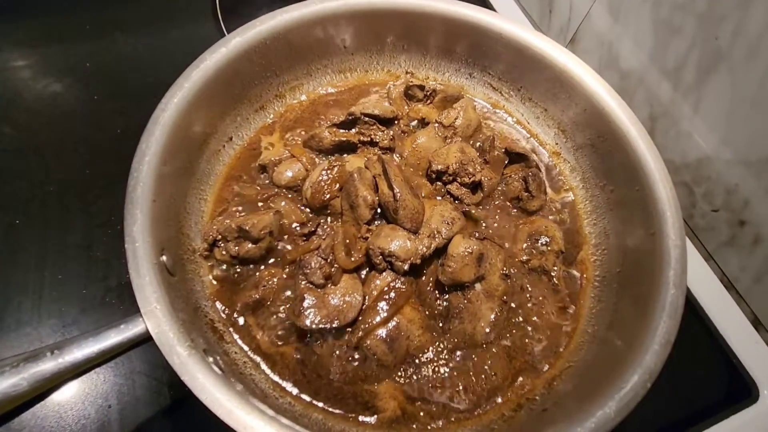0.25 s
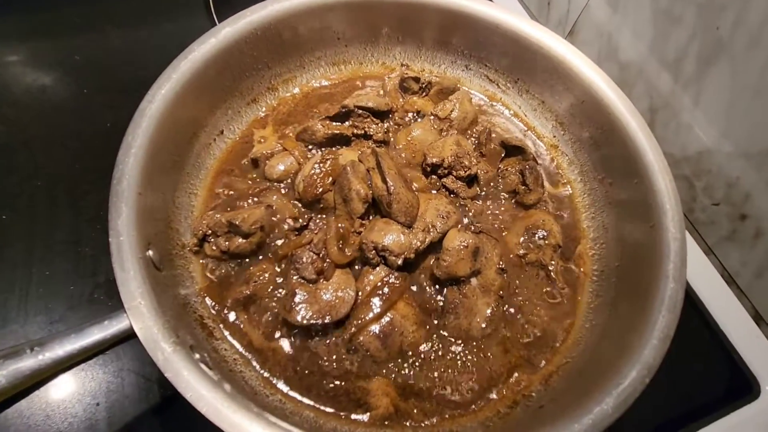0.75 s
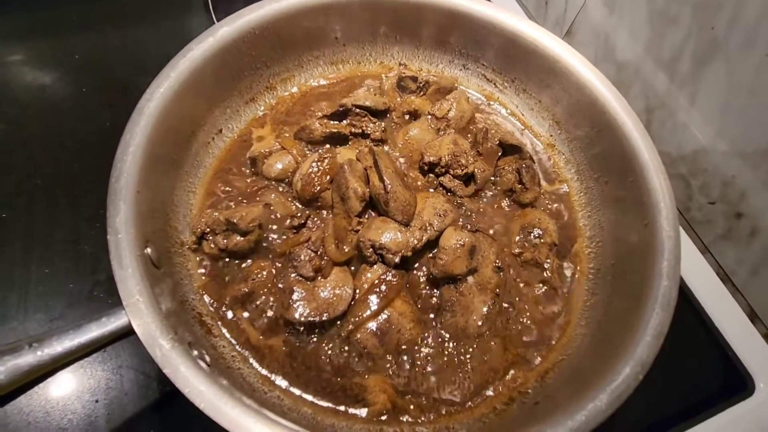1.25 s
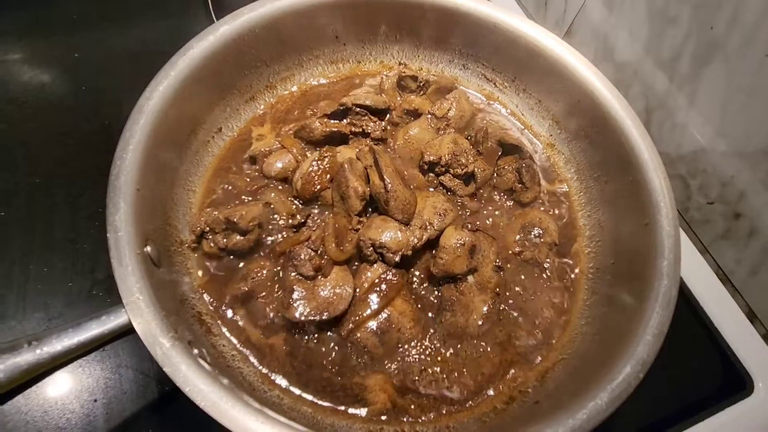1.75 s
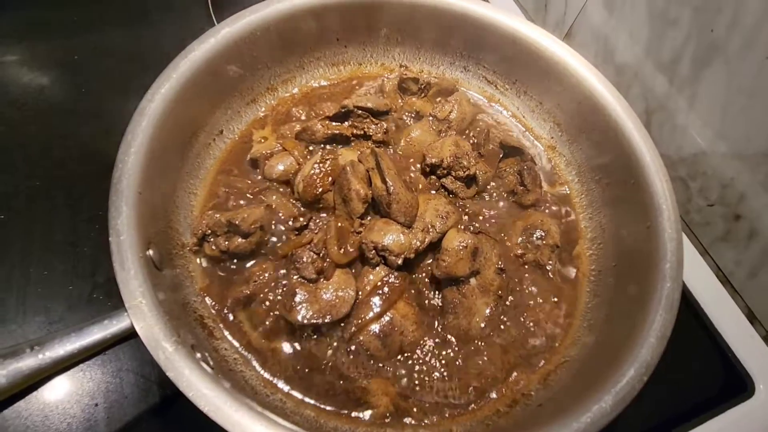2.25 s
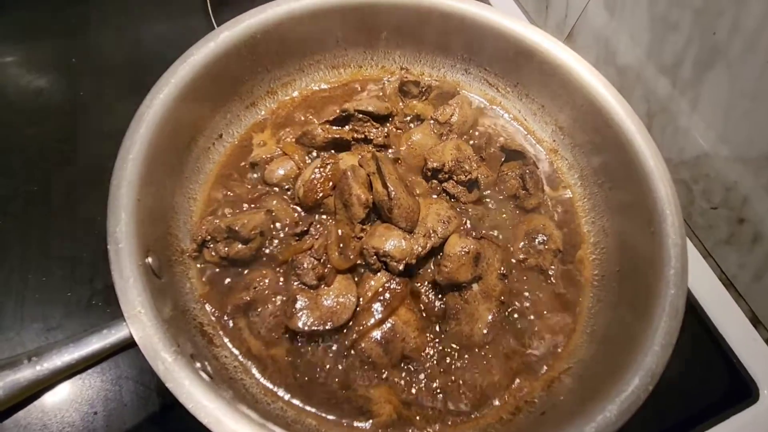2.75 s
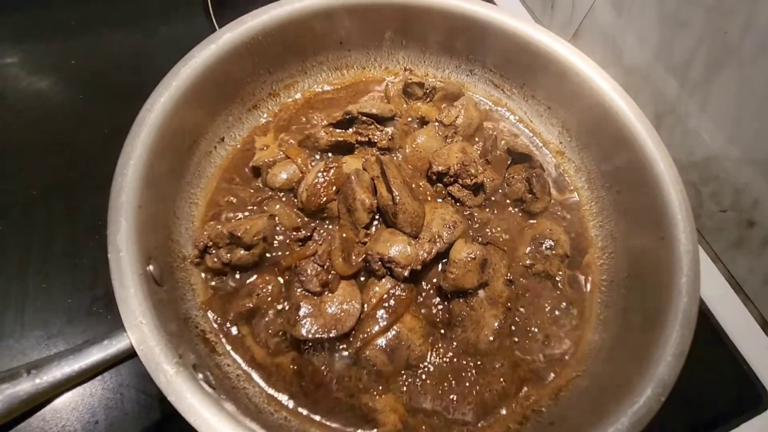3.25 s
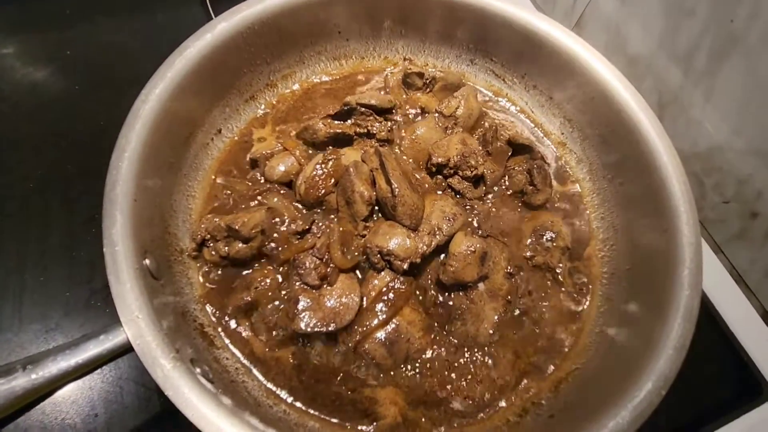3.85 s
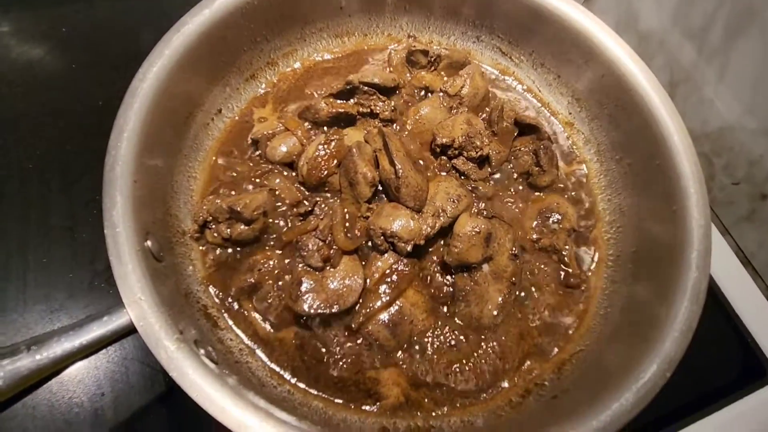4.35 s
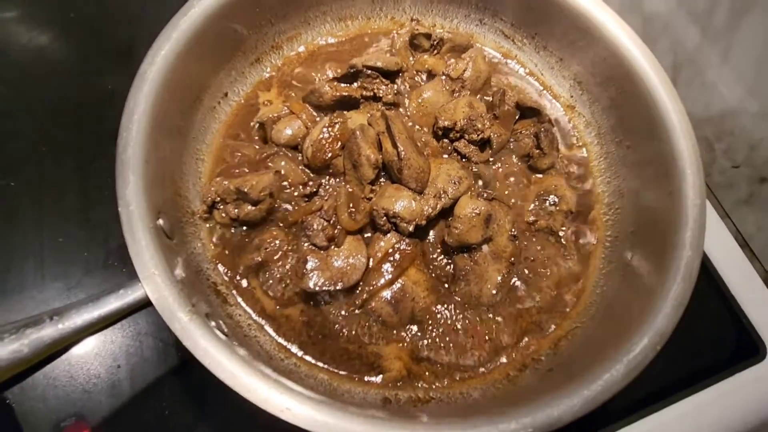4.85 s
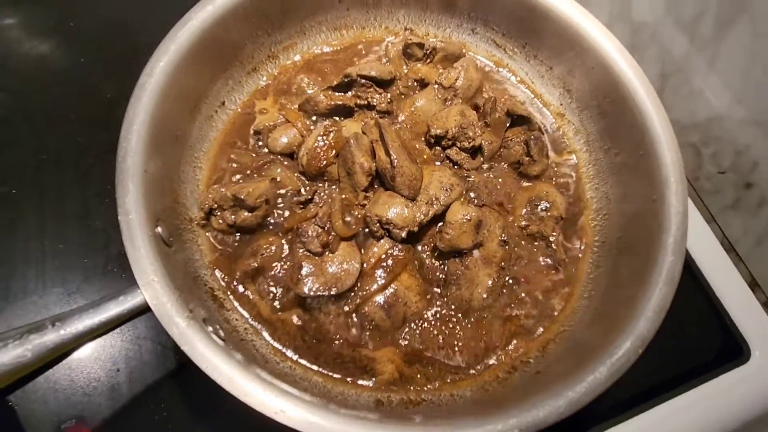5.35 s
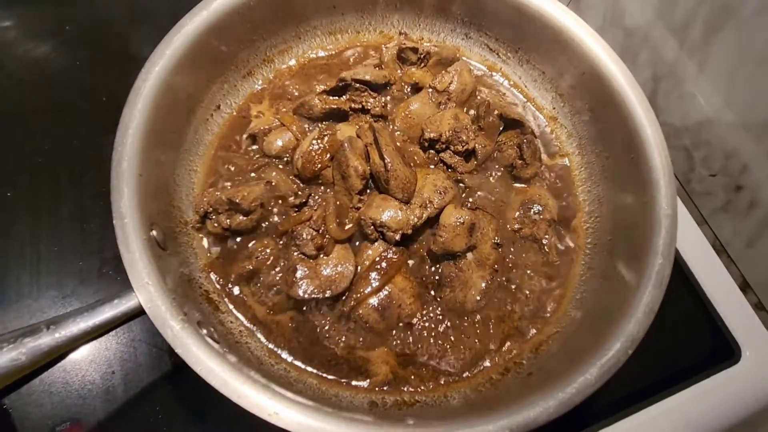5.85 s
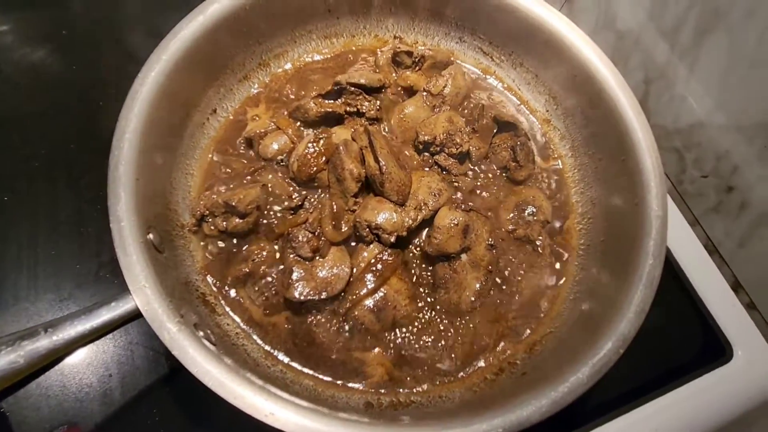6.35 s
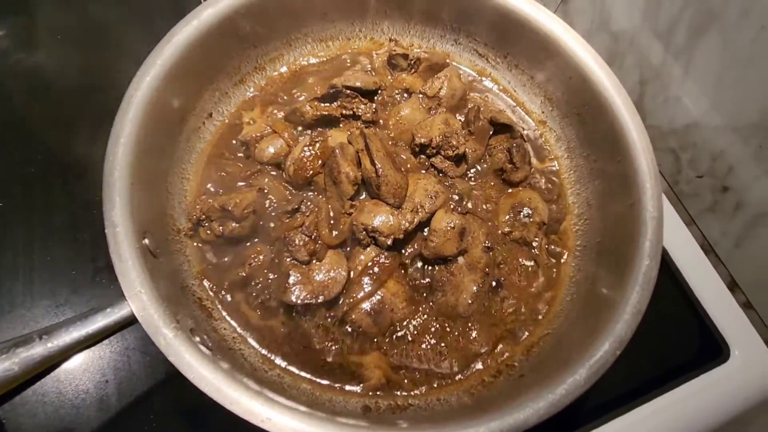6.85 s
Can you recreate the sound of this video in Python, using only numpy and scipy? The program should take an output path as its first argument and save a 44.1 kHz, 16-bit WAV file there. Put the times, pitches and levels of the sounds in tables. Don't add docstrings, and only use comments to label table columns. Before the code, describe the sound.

Thick stew bubbles in a wide metal pan, its delicate high fizz and small snapping bubbles leaning right in a close stereo pickup. A hood fan hums constantly beneath, with airy rumble. After a faint puff early on, draught thumps and flutters heavily against the left side before the middle, weakens, then leaves the steady fan and simmer until a last quick spit.

```python
import sys
import numpy as np
from scipy import signal
from scipy.fft import rfft, irfft, next_fast_len
from scipy.io import wavfile
from scipy.ndimage import uniform_filter1d

SR = 44100
rng = np.random.default_rng(int(sys.argv[2]) if len(sys.argv) > 2 else 0)


def natural_amplitude(level_db):
    exponent = np.asarray(level_db, float) / 20
    return 10 ** exponent


def master(y):
    cut = np.clip(np.atleast_2d(y).T, -1, 1)
    pcm = np.round(cut * 32767)
    wavfile.write(sys.argv[1], SR, pcm.astype(np.int16))


N = 313549

MOTOR_ORDERS = [(1, -1), (1, 0), (0, 5), (1, 1), (2, -1), (2, 0), (0, 10), (2, 1), (3, 0), (0, 15), (4, 0),
                (4, 2)]
# (level [dB rms], left minus right [dB])
MOTOR_LEVELS = [(-34, 0), (-22, 0.25), (-29.6, 0.7), (-46.5, -0.5), (-28.8, -1), (-50, 1), (-25.2, -1.2),
                (-36, 1.2), (-55, -2), (-56, -3), (-55.5, -4), (-55, -7)]
# (frequency [Hz], level [dB per Hz])
RUMBLE = [(20, -70), (55, -61), (76, -50.5), (90, -56.5), (135, -57.5), (152, -47), (165, -52.5),
          (185, -48), (205, -47.5), (232, -58), (280, -50), (320, -56.5), (395, -57.5), (420, -70.5)]
# (frequency [Hz], left level [dB per Hz], right level [dB per Hz])
GRILLE_AIR = [(404, -72, -66.5), (521, -70, -61), (661, -67.5, -78.5), (738, -59, -64.5), (805, -66, -66),
              (1135, -64, -70), (1130, -72, -70.5), (1354, -63, -62.5), (1626, -68.5, -73.5),
              (1832, -74, -63), (2110, -68, -73.5), (2520, -77, -74), (3180, -77, -77),
              (4470, -79.5, -75.5)]
# (arrival [s], length [s], strength on arrival [dB], strength on leaving [dB])
GUSTS = [(0.13, 0.03, -60, -60), (0.32, 0.03, -54, -53), (0.56, 0.23, -41, -56), (2.609, 0.2, -13, -12.5),
         (2.81, 0.17, -14.5, -20.5), (3.026, 0.61, -19, -21), (3.683, 0.5, -21.5, -47),
         (4.306, 0.03, -52, -56), (4.46, 0.037, -44, -49), (4.634, 0.63, -51, -48), (6.363, 0.42, -49, -41),
         (6.94, 0.2, -48, -46)]
# (lowest [Hz], highest [Hz], level in the strongest gust [dB],
# share of the small-swirl curve [0-1], loss per dB of weaker draught [dB])
EDDIES = [(30, 60, -25, 0, .5), (65, 110, -9, 0, 1), (110, 200, -12.5, 1, 1), (200, 330, -17, 1, 1.2),
          (330, 550, -31, 1, 1.7), (550, 850, -37, 1, 1.6)]
# (time [s], level [dB], half-width [ms])
SLAPS = [(2.614, -13, 1.0), (2.633, -16, 1.0), (2.662, -13, 1.2), (2.688, -19, 1.6), (2.722, -12, 1.0),
         (2.765, -16, 1.2), (2.795, -13, 1.1), (2.829, -14, 1.2), (2.878, -16, 1.6), (2.920, -12, 1.5),
         (2.952, -13, 1.3), (3.121, -22, 1.2), (3.162, -21, 1.1), (3.236, -32, 1.8), (3.260, -32, 1.2),
         (3.299, -30, 1.5), (3.346, -30, 1.2), (3.412, -12, .8), (3.490, -27, 1.6), (3.565, -22, 2.2),
         (3.600, -24, 2.2), (3.738, -34, 1.8), (3.797, -44, 1.3), (3.867, -46, 1.6), (3.922, -44, 2.2),
         (3.967, -44, 2.2), (4.066, -38, 2.2)]
# (frequency [Hz], left level [dB per Hz], right level [dB per Hz])
FIZZ = [(1510, -96, -76), (3240, -78, -77.5), (3620, -100, -84), (4170, -93, -77), (6120, -82.5, -79),
        (7500, -86, -74), (8430, -84, -77.5), (9230, -92.5, -82.5), (10960, -92, -88.5),
        (11450, -85.5, -84.5), (12600, -90, -82), (13800, -88.5, -88), (16100, -84, -83.5),
        (16000, -88, -87)]
# (time [s], peak level [dB], pitch [Hz])
POPS = [(0.0209, -23, 5400), (0.3346, -21, 7450), (0.5616, -28, 4020), (1.035, -23, 8300),
        (1.07, -21, 7430), (1.2797, -18, 7400), (1.3059, -24, 7440), (1.3942, -24, 7400),
        (1.698, -27, 4170), (1.8462, -24, 7350), (1.936, -21, 8740), (1.954, -27, 7680),
        (2.3655, -22, 7800), (2.5895, -21, 7200), (2.6349, -27, 7550), (2.8784, -22, 6380),
        (2.955, -24, 7300), (3.2984, -26, 4510), (3.7105, -18, 7400), (4.0407, -24, 8070),
        (4.1335, -20, 7660), (4.4628, -22, 7590), (4.5955, -24, 7810), (5.02, -30, 7610),
        (5.4241, -23, 8090), (5.8551, -21, 7650), (6.0631, -20, 7860), (6.3485, -19, 8510),
        (7.0244, -22, 7200), (7.0303, -22, 7680)]
# (time [s], level [dB rms], half-length [s])
SPIT = (7.035, -31, .005)
# (frequency [Hz], likeness [0-1])
LIKENESS = [(100, .9995), (250, .98), (350, .93), (500, .4), (650, .3), (1000, .55), (1450, .15),
            (4000, .12), (7600, .02), (7750, .72), (8900, .8), (9300, .42), (15000, .4)]

MAINS_HZ, ROTOR_HZ = 120.025, 25.461
MAINS_START, ROTOR_START = 2.3, 3.94
MOTOR_LEAD_S, GRILLE_LEAD_S = .00004, .0003
GRILLE_LOW_HZ, GRILLE_HIGH_HZ = 500, 7600
STRONG_GUST_DB, STILL_DB = -11, -75
RISE_DB_PER_S, FALL_DB_PER_S = 900, 600
LARGE_LEAD_DB, LARGE_TOP_DB, LARGE_FLUTTER_DB = 14.5, -26.5, 3
PUFF_DB, PUFF_S = 3, 0.0096
PORT_HZ, PORT_T60_S, PORT_DB = 141, 0.052, -45.5
POP_LEFT_DB = -13


def rms_one(x):
    return x / np.sqrt(np.mean(x ** 2, axis=-1, keepdims=True) + 1e-20)


def at_hz(points, hz):
    table_hz, *columns = np.transpose(points)
    return np.array([np.interp(np.log(hz), np.log(table_hz), c) for c in columns])


def band_pass(x, low_hz, high_hz):
    return signal.sosfilt(signal.butter(2, [low_hz, high_hz], "band", fs=SR, output="sos"), x)


def drift(rate):
    r = np.exp(-80 * np.pi * rate / SR)
    slow = signal.lfilter([1], [1, -2 * r, r * r], rng.standard_normal(N // 40 + 2002))[2000:]
    return np.interp(np.arange(N) / 40, np.arange(len(slow)), rms_one(slow))


def colour(white, spectrum):
    size = next_fast_len(N)
    hz = np.arange(1, size // 2 + 2) * SR / size
    own, shared = rfft(rms_one(white), size)
    alike = np.clip(at_hz(LIKENESS, hz)[0], 0, 1)
    lead_s = GRILLE_LEAD_S * np.clip(4 * np.log2(hz / GRILLE_LOW_HZ), 0, 1) * (hz < GRILLE_HIGH_HZ)
    left = alike * np.exp(2j * np.pi * hz * lead_s) * shared + np.sqrt(1 - alike ** 2) * own
    octaves_outside = np.abs(np.log2(hz / np.clip(hz, spectrum[0][0], spectrum[-1][0])))
    level_db = at_hz(spectrum, hz) - 24 * octaves_outside
    return irfft(np.array([left, shared]) * natural_amplitude(level_db) * np.sqrt(SR / 2), size)[:, :N]


def motor():
    out = np.zeros((2, N))
    t = np.arange(N) / SR + np.array([[MOTOR_LEAD_S], [0]])
    pull = 2 * np.pi * MAINS_HZ * t + MAINS_START
    turn = 2 * np.pi * ROTOR_HZ * t + ROTOR_START
    for (m, n), (db, pan_db) in zip(MOTOR_ORDERS, MOTOR_LEVELS):
        line = np.cos(m * pull + n * turn + .08 * drift(1.2)) * natural_amplitude(.5 * drift(1.5))
        out += np.sqrt(2) * natural_amplitude(db + np.array([[.5], [-.5]]) * pan_db) * line
    return out


def fan_air():
    rumble = colour(rng.standard_normal((2, N)), RUMBLE) * natural_amplitude(.5 * drift(3))
    rush = colour(rng.standard_normal((2, N)), GRILLE_AIR) * natural_amplitude(.5 * drift(8))
    return rumble + rush


def draught():
    large, small = (db - STRONG_GUST_DB for db in gust_db())
    flutter, left = 2 * drift(70), slaps()
    for low_hz, high_hz, top_db, share, loss in EDDIES:
        band = band_pass(rng.standard_normal(N), low_hz, high_hz)
        band = band / np.sqrt(uniform_filter1d(band ** 2, size=int(3 * SR / low_hz)) + 1e-12)
        weaker = share * small + (1 - share) * large
        left = left + band * natural_amplitude(top_db + loss * (weaker + share * flutter))
    left = left * np.clip((large + 49) / 6, 0, 1)
    left = signal.sosfilt(signal.butter(2, 40, "high", fs=SR, output="sos"), left)
    right = signal.filtfilt(*signal.butter(1, 110, fs=SR), left) / 2
    return np.array([left, right])


def gust_db():
    t, strength = np.arange(N) / SR, np.full(N, float(STILL_DB))
    for s, length, first_db, last_db in GUSTS:
        held = np.interp(t, [s, s + length], [first_db, last_db])
        edge = RISE_DB_PER_S * np.maximum(s - t, 0) + FALL_DB_PER_S * np.maximum(t - s - length, 0)
        strength = np.maximum(strength, held - edge)
    puff = PUFF_DB * np.max([np.exp(-((t - s) / PUFF_S) ** 2) for s, *_ in SLAPS], axis=0)
    large = np.minimum(strength + LARGE_LEAD_DB, LARGE_TOP_DB)
    large = large + 0.67 * puff + LARGE_FLUTTER_DB * drift(13)
    return large, strength + puff


def slaps():
    bumps, ms = np.zeros(N), np.arange(-400, 401) / SR * 1000
    for s, db, half_ms in SLAPS:
        at = round(s * SR)
        bumps[at - 400:at + 401] += natural_amplitude(.4 * db + 7.5) * np.exp(-np.abs(ms / half_ms) ** 1.25)
    r, w = natural_amplitude(-60 / (PORT_T60_S * SR)), 2 * np.pi * PORT_HZ / SR
    ringing = signal.lfilter([0, np.sin(w)], [1, -2 * r * np.cos(w), r * r], bumps + 1e-18)
    bumps = bumps + natural_amplitude(PORT_DB) * ringing
    return signal.sosfiltfilt(signal.butter(2, 70, "high", fs=SR, output="sos"), bumps)


def fizz(per_s, size_db, clump_db, grain_db):
    edges_hz = [1000, 3300, 9500, 18000]
    boils = [clumps(clump_db) for _ in range(3)]
    sizes = natural_amplitude(size_db * np.minimum(rng.exponential(1, N), 3))
    chance, dealt, grains = rng.random(N), rng.integers(0, 10, N), np.zeros((2, N))
    for k, hz in enumerate(np.geomspace(3300, 15000, 10)):
        boil = boils[np.searchsorted(edges_hz, hz) - 1]
        born = chance < per_s * natural_amplitude(1.5 * boil) / SR
        clicks = sizes * born * (dealt == k) * rng.choice([-1, 1], (2, N)) + 1e-18
        r, w = natural_amplitude(-60 * hz / (17 * SR)), 2 * np.pi * hz / SR
        rings = signal.lfilter([1, 0, -1], [1, -2 * r * np.cos(w), r * r], clicks)
        grains += rms_one(rings) * hz ** .3
    haze = 0
    for low_hz, high_hz, boil in zip(edges_hz, edges_hz[1:], boils):
        haze = haze + band_pass(rng.standard_normal((2, N)), low_hz, high_hz) * natural_amplitude(boil)
    return colour(rms_one(haze) + natural_amplitude(grain_db) * rms_one(grains), FIZZ)


def clumps(depth_db):
    boil = .7 * drift(16) + drift(60)
    return depth_db * rms_one(boil - uniform_filter1d(boil, size=SR // 8))


def pops():
    out, t = np.zeros((2, N + 300)), np.arange(300) / SR
    swell = t / 0.00063
    for s, db, hz in POPS:
        blip = np.sin(2 * np.pi * hz * t) * swell * np.exp(1 - swell)
        at = round(s * SR)
        out[:, at:at + 300] += natural_amplitude(db - 5.5 + np.array([[POP_LEFT_DB], [0]])) * blip
    return out[:, :N]


def spit():
    s, db, half_s = SPIT
    hiss = signal.sosfilt(signal.butter(2, 7000, "high", fs=SR, output="sos"), rng.standard_normal(N))
    swell = np.exp(-((np.arange(N) / SR - s) / half_s) ** 2)
    return natural_amplitude(db + np.array([[-4.0], [0]])) * hiss * swell


def scene():
    pan = fizz(per_s=1500., size_db=4.0, clump_db=1.2, grain_db=-3.0) + pops() + spit()
    return motor() + fan_air() + draught() + pan


def band_limit(x):
    return signal.sosfilt(signal.butter(12, 17040, fs=SR, output="sos"), x)


def record(dry):
    limited = dry / (1 + (np.abs(dry) / .95) ** 8) ** (1 / 8)
    cut = signal.sosfilt(signal.cheby2(20, 60, 16000, fs=SR, output="sos"), limited)
    return band_limit(cut)


dry = scene()
out = record(dry)
master(out)
```